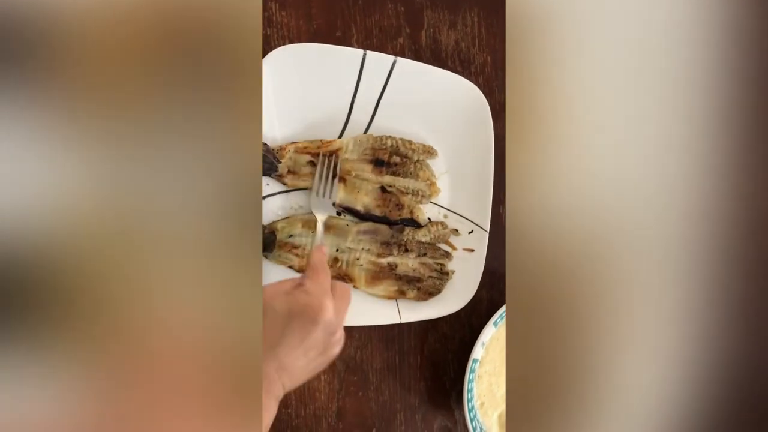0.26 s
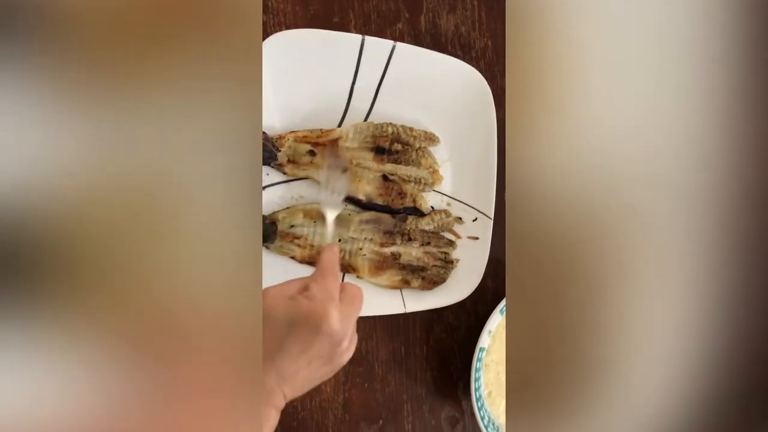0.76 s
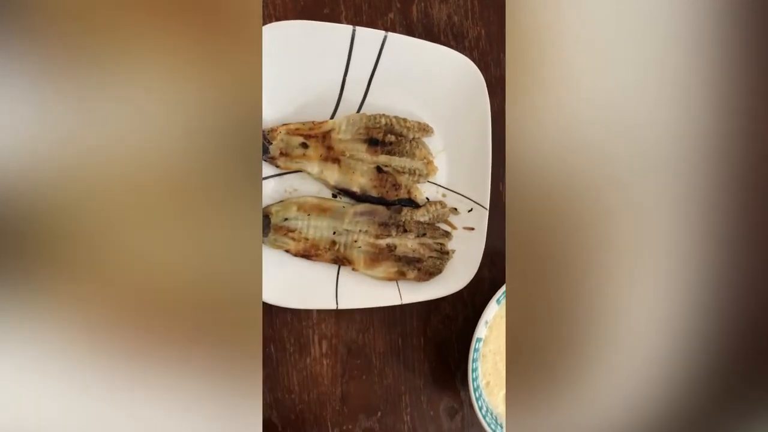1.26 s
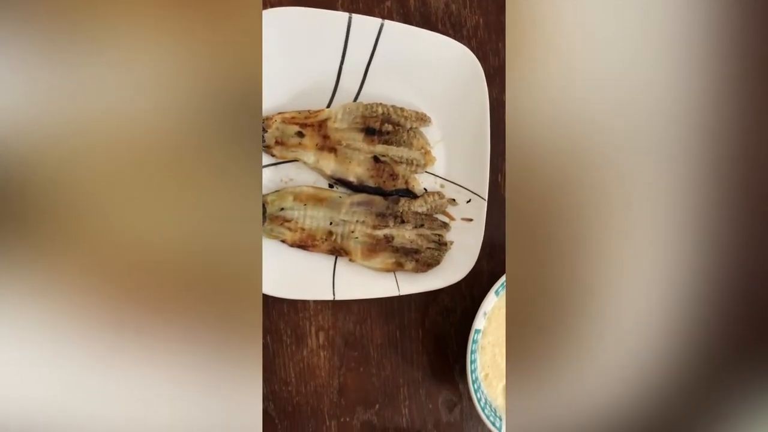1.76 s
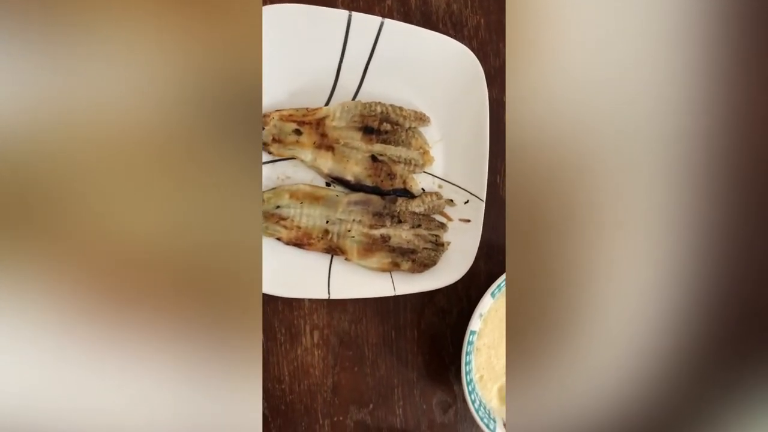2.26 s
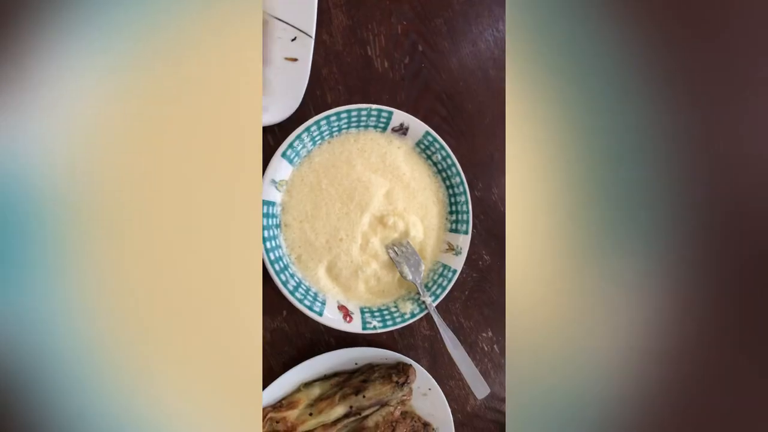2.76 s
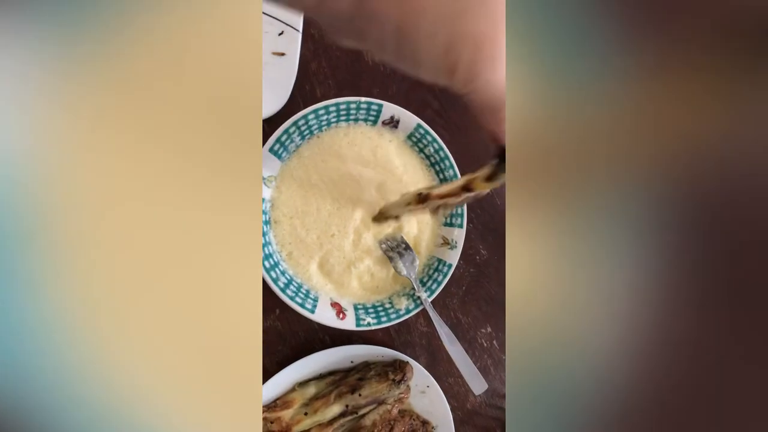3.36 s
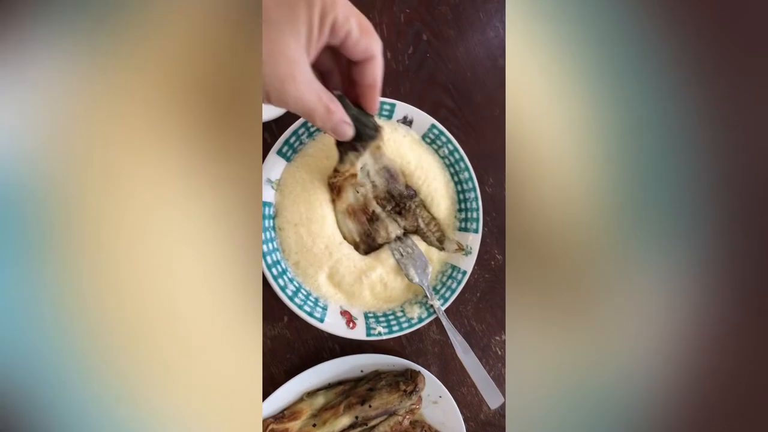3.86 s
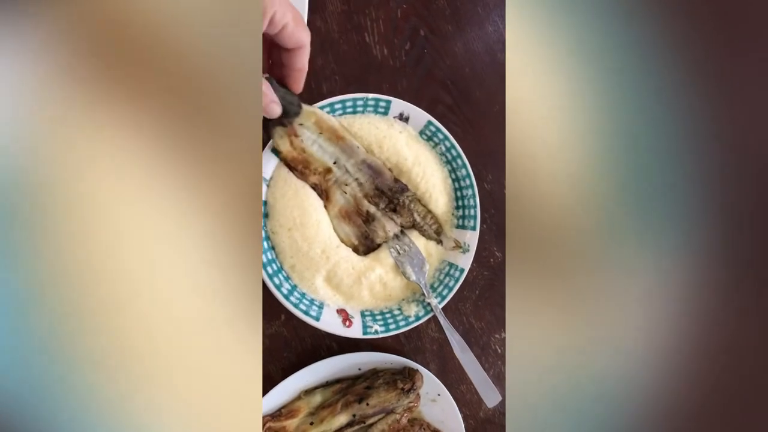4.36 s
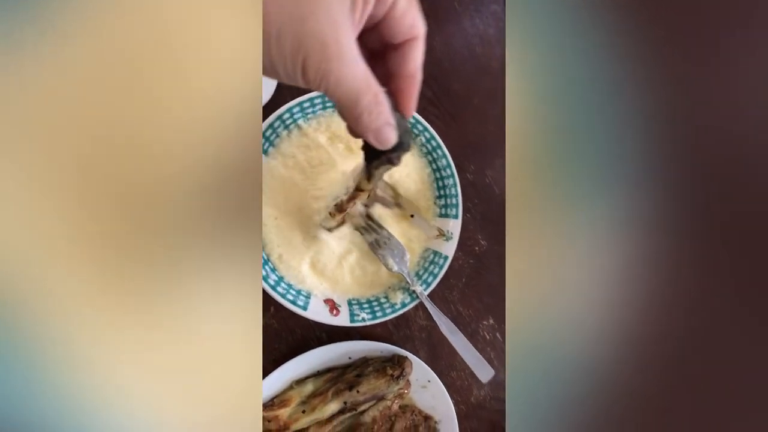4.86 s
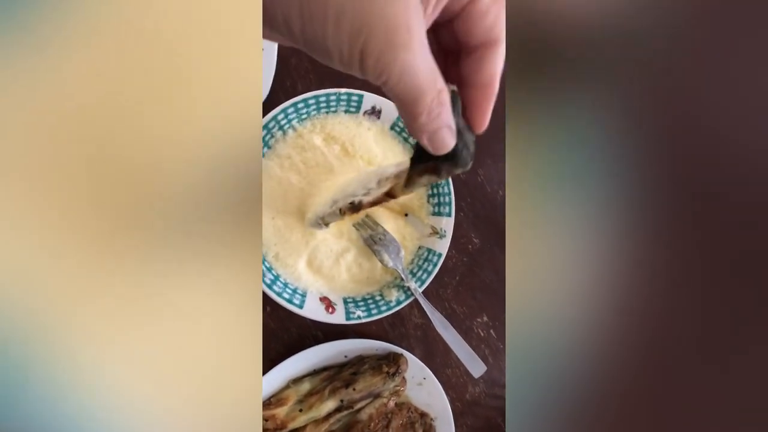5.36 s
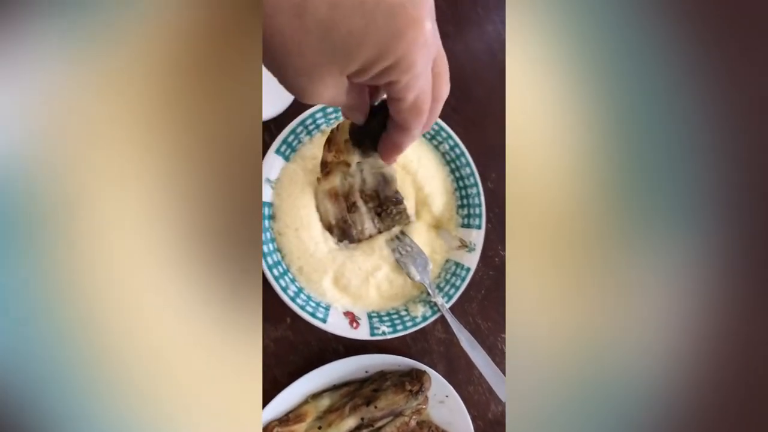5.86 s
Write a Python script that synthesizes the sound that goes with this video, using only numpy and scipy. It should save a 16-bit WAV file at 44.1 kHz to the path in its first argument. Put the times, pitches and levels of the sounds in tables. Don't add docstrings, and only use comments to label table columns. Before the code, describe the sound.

Fork ticks on soft food, then rings and rattles on a plate, a loud dish and lid clatter, cut to close bowl bumps and taps.

```python
import sys
import numpy as np
from scipy import signal
from scipy.fft import rfft, irfft
from scipy.io import wavfile
from scipy.ndimage import uniform_filter1d

SR = 44100
rng = np.random.default_rng(int(sys.argv[2]) if len(sys.argv) > 2 else 0)


def waveform_to_disk(signal):
    frames = np.transpose(np.atleast_2d(signal))
    scaled = np.clip(frames, -1, 1) * 32767
    samples = np.round(scaled).astype(np.int16)
    wavfile.write(sys.argv[1], SR, samples)


def field_ratio(decibels):
    return 10 ** (np.asarray(decibels, dtype=float) / 20)


N = 269892
t = np.arange(N) / SR
CUT, RESUME = 2.5625, 2.611


def evened(x):
    return x / np.sqrt(np.mean(x ** 2) + 1e-20)


def read(points, hz):
    f, value = np.transpose(points)
    return np.interp(np.log(hz + 1), np.log(f + 1), value)


def add(mix, s, sound):
    part = mix[round(s * SR):][:len(sound)]
    part += sound[:len(part)]


def coloured(x, points):
    gain = field_ratio(read(points, np.fft.rfftfreq(len(x), 1 / SR)))
    return irfft(rfft(x) * gain, len(x))


def causal(points, focus_hz):
    hz = abs(np.fft.fftfreq(2048, 1 / SR))
    octaves = np.log2((hz + 1) / (focus_hz + 1))
    lift_db = (focus_hz > 0) * 5.5 * np.exp(-(octaves / 0.31) ** 2)
    log_gain = np.log(field_ratio(read(points, hz) + lift_db))
    return np.fft.ifft(np.exp(np.conj(signal.hilbert(log_gain)))).real[:1024]


def level(tables):
    return sum(field_ratio(np.interp(t, *np.transpose(rows), -150, -150)) for rows in tables)


def strokes(rows):
    curves = []
    for s, rise, hold, fall, db in rows:
        corners_s = s + np.cumsum(np.abs([0, rise, hold, fall]))
        curves.append(np.c_[corners_s, db - 32 * np.array([1, 0, 0, 1])])
    return level(curves)


def friction(rows, colour, per_s, spread_db):
    happens = rng.random(N) < per_s / SR
    size = field_ratio(spread_db * np.minimum(rng.exponential(1, N), 4))
    slips = happens * size * rng.standard_normal(N)
    return strokes(rows) * evened(coloured(slips, colour))


def ring(modes, damping, spot_db, split, u=t[:7000]):
    hz, db, t60 = np.transpose(modes)[:, :, None]
    beat = 1 + .6 * np.cos(2 * np.pi * hz * split[:, None] * u)
    decay = field_ratio(db + spot_db[:, None] - 60 * u / (t60 * damping))
    return evened((decay * beat * np.sin(2 * np.pi * hz * u)).sum(0))


def strikes(hits, touch, modes, damping, ring_db, spot_db, split, haze_db):
    low_db, ms, crack_db = touch
    ms = np.clip(ms, .1, 6)
    lasts_s = np.clip(damping * np.max(modes, axis=0)[2], .06, .3)
    u, out, count = t[:round(SR * lasts_s)], np.zeros(N), len(modes)
    for s, peak_db, high_db, *focus_hz in hits:
        chance = rng.standard_normal(8100)
        push = np.r_[2.2, chance[101:1100]] * np.exp(-u[:1000] * 1000 / ms)
        body = ring(modes, damping, spot_db * chance[:count], split * chance[count:2 * count], u)
        body = body * (1 - np.exp(-u * 3000 / ms))
        dense = np.resize(chance[1100:], len(u))
        dull = uniform_filter1d(dense, size=4)
        haze = dull * field_ratio(-60 * u / 0.06) + (dense - dull) * field_ratio(-60 * u / 0.02)
        body = field_ratio(ring_db) * body / np.linalg.norm(body) + field_ratio(haze_db) * haze / np.linalg.norm(haze)
        crack = field_ratio(crack_db) * np.pad(push, (0, len(u) - len(push)))
        hardness = [(60, low_db - 29.5), (230, low_db + 6.5), (330, low_db + 12.0), (1100, low_db + 8.5),
                    (2200, 0.0037), (6000, 0.094 * high_db), (9000, high_db - 0.5), (16000, high_db - 3.5)]
        sound = body * np.linalg.norm(push) + crack
        sound = signal.fftconvolve(sound, causal(hardness, sum(focus_hz)))
        add(out, s, field_ratio(peak_db) * sound / abs(sound).max())
    return out


def air(points, db, patchy_db):
    a, b, patches = rng.standard_normal((N // 256 + 5, 513, 3)).T
    patches = uniform_filter1d(uniform_filter1d(patches, size=10, axis=0), size=10, axis=1)
    z = (a + 1j * b) * field_ratio(patchy_db * evened(patches))
    noise = signal.istft(z, nperseg=1024, noverlap=768)[1][:N]
    return field_ratio(db) * evened(coloured(noise, points))


AIR_FIRST = [(310, -68), (520, -6), (636, -1.5), (789, -8.5), (925, -5.5), (1420, -16.5), (1620, -14),
             (1930, -19), (4130, -27), (4770, -33.5), (5920, -30.5), (7670, -40), (13400, -43),
             (16200, -74)]
RUMBLE_FIRST = [(15, -43.5), (30, -11), (65, -12.5), (90, -2.5), (125, -1), (160, -5), (190, -1),
                (230, -4.5), (270, -8), (380, -5), (500, -11), (700, -41)]


def air_before():
    return air(AIR_FIRST, -54, 0.98) + air(RUMBLE_FIRST, -53.5, 0.76)


# [t/s, f/Hz]
BLADE_TONE = [
    [(0, 131.66), (2.6, 131.66)],
    [(2.6, 130.92), (4, 131), (5.2, 131.07), (6.2, 131.2)],
]
IN_PHASE = [.026, 3.054]
# [multiple of blade tone,
# level/dB, wavering/dB]
BLADE_PARTIALS = [
    [(1, -55, 2), (2, -64.5, 4), (3, -65.5, -1), (3.6, -68, -4.5)],
    [(.6, -83, 3), (1, -54, 1.5), (2, -60.5, 2), (2.75, -71, 1), (3, -69, 5.5), (3.612, -68, 2.5),
     (4.15, -72.5, 0.5), (4.6, -73, -3.5), (5.18, -69.5, -2.5)],
]


def appliances(shot):
    turns = np.cumsum(np.interp(t, *np.transpose(BLADE_TONE[shot]))) / SR
    turns -= np.interp(IN_PHASE[shot], t, turns)
    slow = [(0, -13), (1.5, 0.0), (6, -0.5), (12, -20), (30, -81)]
    waver = evened(coloured(rng.standard_normal(N), slow))
    tones = field_ratio(-50) * np.cos(2 * np.pi * 120 * (t - IN_PHASE[shot]))
    for k, db, waver_db in BLADE_PARTIALS[shot]:
        own_waver = np.roll(waver, round(k * SR))
        tones += field_ratio(db + waver_db * own_waver) * np.cos(2 * np.pi * k * turns)
    return np.sqrt(2) * tones


# [t/s, level/dB]
ROAD_LEVEL = [
    (0.0, -85),
    (0.5, -74),
    (1.17, -60.5),
    (2.57, -57),
]


def road():
    colour = [(300, -27.5), (600, -30.5), (1050, 17.5), (1300, 9.0), (1700, -21.0), (3000, -49.5)]
    return level([ROAD_LEVEL]) * air(colour, -0.7, 2.5)


# [t/s, peak level/dB, highs re mids/dB]
TINE_TICKS = [(0.1301, -47, 7), (0.2284, -55, 15), (0.2355, -53, 17), (0.4135, -55, 15), (0.869, -48, -6),
              (5.055, -55, -10), (0.3426, -40, 7), (0.4224, -52, 5), (0.5472, -39.5, 9),
              (0.7587, -36.5, 8.5), (0.8645, -45, 4), (0.9203, -44.5, 2), (1.0525, -47, 8),
              (1.2042, -40.5, 0), (1.2224, -45, 2), (2.8399, -49, 1), (3.2764, -44, 1), (3.2949, -51, -4),
              (3.3024, -54, 0), (3.3214, -41, -1), (3.3304, -41, 12), (3.5894, -47, 7), (3.7634, -52, 7),
              (3.8374, -49, 8), (4.2904, -52, 2), (4.3534, -48.5, 4), (4.5965, -43, 8), (4.6924, -45, 10),
              (5.7764, -60, -5), (5.9713, -47, 19), (6.0177, -44, 31), (6.0731, -42, 20)]
# [f/Hz, level/dB, t60/s]
BOWL_MODES = [(2230, -55, 0.029), (2940, -1.5, 0.039), (3780, -3, 0.033), (4550, 6.5, 0.01),
              (5450, -8, 0.034), (6070, 11.5, 0.0068), (7800, -9, 0.023), (12100, -12, 0.018)]


def ticks():
    return strikes(TINE_TICKS, (-32, 0.33, 0), BOWL_MODES, 0.34, -1.2, 2.2, .01, -2.5)


# [f/Hz, t60/s]
ROOM_DECAY = [(200, 0.49), (530, 0.63), (1400, 0.5), (3700, 0.33), (9700, 0.28), (16000, 0.4)]


def room(x):
    taps = np.zeros(SR)
    at = np.arange(160, SR - 20, 20)
    taps[at + rng.integers(0, 20, len(at))] = rng.choice([-1., 1.], len(at))
    hz, s, z = signal.stft(taps, SR, nperseg=256)
    decay = field_ratio(-60 * s / read(ROOM_DECAY, hz)[:, None])
    tail = signal.istft(z * decay, SR, nperseg=256)[1]
    return signal.fftconvolve(x, tail / np.linalg.norm(tail))[:N]


# [t/s, peak level/dB, highs re mids/dB, favoured f/Hz]
PLATE_HITS = [(1.5186, -10, -0.5, 6200), (1.5198, -14.5, 9, 3780), (1.5257, -19, -2, 3700),
              (1.529, -26, -18, 3010), (1.629, -36.5, -4, 5200), (1.6338, -20.5, -5, 4000),
              (1.645, -39, -15, 4530), (1.7112, -16, -7, 3200), (1.722, -17.5, -6, 3300),
              (1.7402, -21.5, -8, 3200), (1.7722, -10.5, 2.5, 3840), (1.7792, -16, -7, 2800),
              (1.783, -38, -8.5, 2980), (1.7922, -18.5, -13.5, 2580), (1.798, -18, -1, 2710),
              (1.8045, -26, -19, 2920), (1.8105, -26.5, -12, 3570), (1.8304, -28, -8, 3500),
              (1.836, -40.5, -6, 2970),
              (1.998, -42, -18, 2560), (1.552, -41, -14, 4000), (1.663, -40, -24, 3780),
                (1.7629, -21, -13.5, 3000), (2.017, -35.5, -6, 2440), (2.0228, -33, -19, 2540),
                (2.0437, -26, -10, 2430), (2.05, -22, 4.5, 2340), (2.058, -35, -8, 8000)]
PLATE_MODES = np.c_[[2550, 2760, 3160, 3490, 3640, 4030, 4300, 4550, 4900, 5250, 5700, 6400, 7250, 8220, 11800, 13150],
               [(-3, .04), (-2, .04), (0, .07), (-2, .04), (-4, .05), (-2, .04), (-4, .03), (-5, .03),
               (-5, .04), (1, .06), (-6, .025), (0, .02), (-6, .025), (-3, .025), (-8, .03), (-7, .03)]]
# [f/Hz, gain/dB]
PLATE_RADIATION = [(1900, 5), (2150, -23), (2450, -1), (7200, 1), (7700, -9.5), (8100, 6), (9000, -3.5),
                   (10600, -2.5), (11600, -3.5), (14500, -1.5), (16000, -5.5)]


def plate():
    hits = PLATE_HITS
    sound = strikes(hits, (-20.5, 0.91, 4.8), PLATE_MODES, 0.3, 3.2, 2.5, 0.018, 1.5)
    return signal.oaconvolve(sound, causal(PLATE_RADIATION, focus_hz=0))[:N]


# [t/s, peak level/dB, highs re mids/dB, favoured f/Hz]
UNDER_BLOWS = [(1.5195, -40, -35, 400), (1.527, -26.5, -25, 1000), (1.636, -37, -32, 600),
               (1.658, -32.5, -30, 900), (1.713, -31.5, -32, 500), (1.724, -35, -30, 1000),
               (1.742, -41, -30, 900), (1.762, -40, -30, 1850), (1.774, -26, -30, 1850),
               (1.782, -40, -30, 406), (1.798, -29, -34, 1010), (1.815, -32.5, -24, 407),
               (4.7555, -40, -25, 696), (4.787, -47, -30, 900), (4.807, -47, -30, 700)]
UNDER_MODES = np.c_[[266, 389, 551, 816, 956, 1094, 1184, 1361, 1450, 1780, 1868, 1925], [(0, .11),
               (-1, .11), (-3, .09), (-3, .07), (0, .08), (-2, .08), (-1, .09), (-4, .08), (-6, .06),
               (-5, .06), (-5, .07), (-6, .06)]]


def under():
    return strikes(UNDER_BLOWS, (-1, 6.8, -25), UNDER_MODES, 0.72, 4.9, 2.5, 0.019, 1)


def singing(rubbing, db):
    body = ring(PLATE_MODES, .35, *np.zeros((2, len(PLATE_MODES))))
    return rubbing + field_ratio(db) * signal.oaconvolve(rubbing, body / np.linalg.norm(body))[:N]


# [start t/s, rise/s, hold/s, fall/s, level/dB]
SLIDE_STROKES = [
    (1.705, 0.008, 0.085, 0.33, -43),
    (2.06, 0.064, 0.14, 0.27, -39),
]
# [f/Hz, level/dB per Hz]
SLIDE_SPECTRUM = [(150, -17), (330, -8), (700, 0.5), (1500, 8.5), (2600, 11), (5200, 3), (8500, -9),
                  (15500, -36)]


def slide():
    return singing(friction(SLIDE_STROKES, SLIDE_SPECTRUM, 8300, 2.0), -35.0)


# [start t/s, rise/s, hold/s, fall/s, level/dB]
SCRAPE_STROKE = [
    (1.96, 0.078, 0.018, .05, -40),
]
# [f/Hz, level/dB per Hz]
SCRAPE_SPECTRUM = [(400, -19), (1900, -6.5), (2500, -1), (3000, -7.5), (3700, -5), (4500, -12),
                   (5300, -0.5), (8200, -14), (16000, -25)]


def scrape():
    return singing(friction(SCRAPE_STROKE, SCRAPE_SPECTRUM, 5400, 2.4), -6.5)


# [t/s, peak level/dB, highs re mids/dB, favoured f/Hz]
DISH_BLOWS = [(2.0688, -4, -35, 2240), (2.1398, -22, -2.5, 5900), (2.1405, -10, -38, 2850),
              (2.1445, -30, -18, 3050), (2.1805, -15, -12.5, 4230), (2.1855, -11, -33, 3200),
              (2.19, -34, -18, 2520), (2.2075, -19, -13.5, 2380), (2.2255, -17.5, -10, 1880),
              (2.238, -45, -24, 2200), (2.2497, -22, -23, 2480), (2.269, -48, -24, 2020)]
ROCKING = [(2.0735, -17, -49, 1360), (2.079, -24, -21, 1900), (2.087, -18, -36.5, 1240),
           (2.101, -18, -40, 1560), (2.112, -20, -18, 1680), (2.1185, -29, -46, 1980),
           (2.13, -30, -9.5, 1800), (2.148, -36, -13.5, 2800), (2.152, -14.5, -21, 1480),
           (2.161, -39, -27, 1400), (2.1755, -40, -24, 2520), (2.195, -31, -21, 2200)]
DISH_MODES = np.c_[[365, 440, 1092, 1250, 1477, 1567, 1850, 1940, 2070, 2385, 2855, 3145, 3900, 4620, 5880],
              [(-8, .15), (-12, .08), (-3, .1), (-3, .1), (-3, .08), (-2, .09), (-1, .07), (0, .08),
              (0, .07), (-1, .05), (-2, .05), (-3, .05), (-4, .04), (-4, .04), (-1, .04)]]


def dishes():
    slam = strikes(DISH_BLOWS[:1], (-14, .7, 5), DISH_MODES, .42, 2.3, 2.5, 0.003, 2.9)
    edges = strikes(DISH_BLOWS[1:], (-17.5, 1.5, 2.4), DISH_MODES, .42, 0.3, 2.5, 0.003, -0.8)
    rocks = strikes(ROCKING, (-3.5, 1.6, 0), DISH_MODES, 0.23, -1.9, 2.5, 0.019, -0.76)
    return slam + edges + rocks


# [t/s, peak level/dB, highs re mids/dB, favoured f/Hz]
LID_BLOWS = [
    (2.0688, -20, -7, 4900),
    (2.1224, -6.5, -1.5, 6400),
    (2.1236, -12, 11, 14100),
]
LID_MODES = np.c_[[4620, 5205, 5875, 7548, 9160, 9590, 9765, 11250, 12015, 13100, 13860, 14560],
             [(-11, .12), (-13, .2), (0, .015), (-14, .36), (-17, .25), (-8, .36), (-4, .07), (-11, .3),
             (-17, .1), (4, .012), (-10, .03), (3, .015)]]


def lid():
    return strikes(LID_BLOWS, (-31.5, 1, 3), LID_MODES, .95, 4, 0.9, 0.0027, -9.0)


# [f/Hz, level/dB per Hz]
AIR_SECOND = [(310, -63), (520, 3), (567, -1), (609, 7), (636, 1), (789, 2.5), (1040, 0.5), (1080, -4),
              (1440, -4), (2290, -9.5), (3190, -12.5), (7560, -27.5), (14600, -35.5), (16200, -59)]
RUMBLE_SECOND = [(15, -38), (30, -5.5), (65, -11), (90, -2.5), (125, -6.5), (160, -3.5), (230, -3),
                 (265, -1.5), (310, -11), (390, -5.5), (440, -12.5), (500, -26), (700, -37)]


def air_after():
    return air(AIR_SECOND, -56.5, 1.3) + air(RUMBLE_SECOND, -55.5, 0.32)


# [start t/s, rise/s, hold/s, fall/s, level/dB]
SHUFFLE_STROKES = [
    (2.62, 0.017, 0.054, 0.22, -50.5),
    (3.09, 0.044, 0.0079, 0.2, -49),
]
# [f/Hz, level/dB per Hz]
SHUFFLE_SPECTRUM = [(500, -9.5), (1200, -16), (2500, -6.5), (5000, -12), (9000, -21.5), (16000, -33)]


def shuffle():
    return friction(SHUFFLE_STROKES, SHUFFLE_SPECTRUM, 8300, 2.4)


# [t/s, peak level/dB, highs re mids/dB, favoured f/Hz]
BOWL_BUMPS = [(2.6298, -26, 4, 3950), (2.6487, -22.5, -2.5, 2940), (3.0995, -39, -47, 2750),
              (3.13, -49, -34, 2780), (3.1424, -24.5, 10.5, 4930), (3.1795, -39, 13, 7000),
              (3.496, -45, -4, 4240)]


def bowl():
    return strikes(BOWL_BUMPS, (-3, 0.86, 0), BOWL_MODES, 0.32, 9.3, 0.66, 0.014, 7.4)


# [t/s, peak level/dB]
TABLE_BUMPS = [(2.6299, -18.5), (2.652, -31.5), (2.664, -28.5), (2.677, -32), (2.708, -39), (2.739, -47),
               (4.756, -41), (4.781, -40), (4.807, -40)]
# [f/Hz, level/dB, t60/s]
TABLE_MODES = [(65.2, -13, 0.19), (115, -25.5, 0.23), (149, 9, 0.047), (153, 2, 0.042), (278, 6, 0.077),
               (355, -1.5, 0.1), (414, -23, 0.051), (667, -3, 0.035)]


def bumps():
    out = np.zeros(N)
    for s, peak_db in TABLE_BUMPS:
        spot = rng.standard_normal(len(TABLE_MODES))
        knock = ring(TABLE_MODES, 0.69, 1.7 * spot, 0.011 * spot)
        knock = knock * np.minimum(t[:7000] / 0.0052, 1)
        add(out, s, field_ratio(peak_db) * knock / abs(knock).max())
    return out


# [t/s, peak level/dB, highs re mids/dB, favoured f/Hz]
FORK_TOUCHES = [
    (2.6565, -30.5, -8, 7850),
    (2.663, -36, 5, 8000),
    (2.708, -44, 1, 8100),
    (4.7535, -18, 3.5, 8400),
    (4.7562, -22, -4, 7700),
]
REBOUNDS = [(4.7855, -32, 5, 3900), (4.8053, -29, -6, 8300), (4.8185, -36.5, -3, 11200),
            (4.775, -54, 5, 8000), (4.826, -45, -19, 3060)]
FORK_MODES = np.c_[[388, 900, 3063, 3900, 4690, 4753, 7485, 8035, 8550, 9530, 11160, 11480, 13400, 14860],
              [(-15, .1), (-10, .03), (-16, .17), (1, .011), (-26, .42), (-17, .045), (-3.5, .045),
              (0, .042), (-11, .03), (-11, .03), (-8, .025), (-6, .022), (-7, .012), (-12, .04)]]


def fork():
    touches = strikes(FORK_TOUCHES, (-13, 3.2, 1.5), FORK_MODES, 0.98, 14.0, 1.2, 0.011, -0.98)
    rebounds = strikes(REBOUNDS, (-15, 3, -22), FORK_MODES, 0.66, 7.4, 1.2, 0.0057, -8)
    return touches + rebounds


# [start t/s, rise/s, hold/s, fall/s, level/dB]
PEEL_STROKE = [
    (3.24, 0.074, 0.17, 0.11, -59.5),
]
# [f/Hz, level/dB per Hz]
PEEL_SPECTRUM = [(2000, -25), (4000, 4), (6200, 7), (8500, 5.5), (12000, 5), (16000, 3)]


def peel():
    return friction(PEEL_STROKE, PEEL_SPECTRUM, 9000, 3.5)


# [t/s, peak level/dB, highs re mids/dB, favoured f/Hz]
DRAGS = [(4.0548, -40, -6, 3200), (4.066, -43, -10, 2900), (4.0712, -38, -17, 3130),
         (4.0772, -36.5, -6, 3130)]
# [f/Hz, level/dB, t60/s]
RIM_MODES = [(2130, -7, .012), (2560, -6, 0.013), (2850, -5, .014), (3130, -1.5, 0.016), (3450, -11, 0.013),
             (3940, -14, 0.014), (6200, -11, 0.016), (6640, -14, .02), (8500, -8, .012)]


def rim_drags():
    return strikes(DRAGS, (-14, 3.2, -6), RIM_MODES, 0.87, 4, 1.7, 0.037, 3)


def scene():
    first = t < (CUT + RESUME) / 2
    near = ticks() + bowl() + fork() + peel() + shuffle()
    far = plate() + dishes() + lid() + slide()
    near += bumps() + rim_drags()
    events = near + field_ratio(-13) * room(near) + far + field_ratio(-6) * room(far) * first
    before = road() + air_before() + appliances(shot=0)
    after = air_after() + appliances(shot=1)
    events += scrape() + under()
    return (events + np.where(first, before, after))[None]


def low_pass(x):
    return signal.sosfilt(signal.butter(12, 16500, fs=SR, output="sos"), x)


# [f/Hz, gain/dB]
MICROPHONE_RESPONSE = [(20, -18.5), (45, -1), (7200, -1.5), (7700, -4), (8300, -2), (9600, -3), (10500, -6),
                       (11500, -3), (13500, -2), (15500, -5.5), (16100, -14.5), (16700, -53)]


def record(dry):
    gate_s = [CUT - .0005, CUT, CUT + 0.011, CUT + 0.0163,
              RESUME - .002, RESUME, RESUME + 0.0075, RESUME + 0.034]
    gate_db = np.interp(t, gate_s, [0.5, -15, -35.0, -100, -100, -17.0, -5, 1.0])
    mix = coloured(dry[0], MICROPHONE_RESPONSE)[None] * field_ratio(gate_db)
    return low_pass(mix)


dry = scene()
out = record(dry)
waveform_to_disk(out)
```